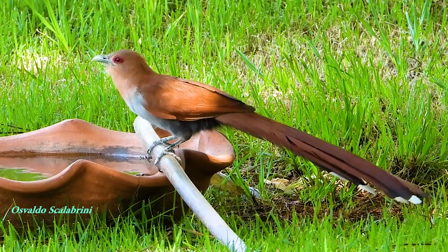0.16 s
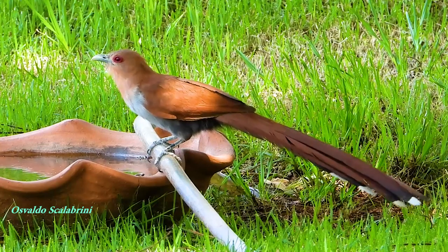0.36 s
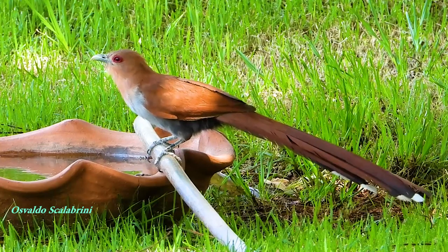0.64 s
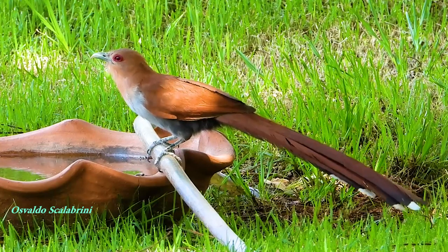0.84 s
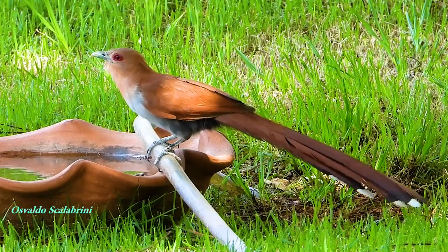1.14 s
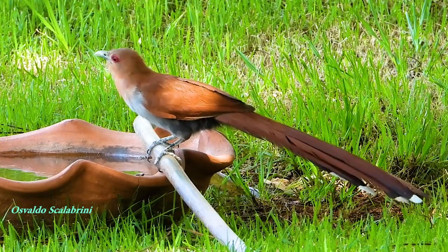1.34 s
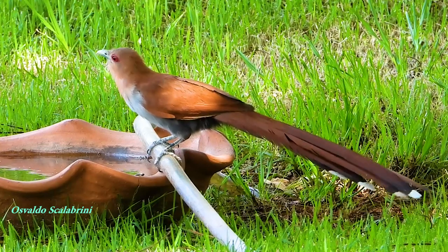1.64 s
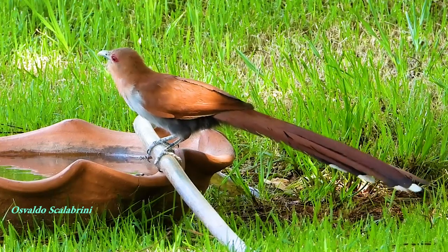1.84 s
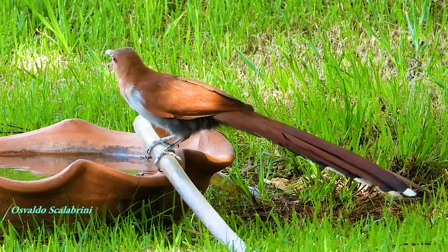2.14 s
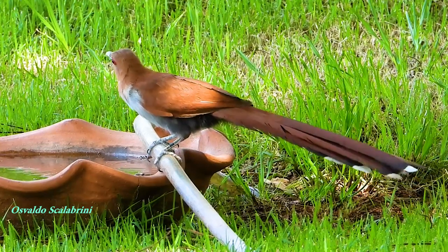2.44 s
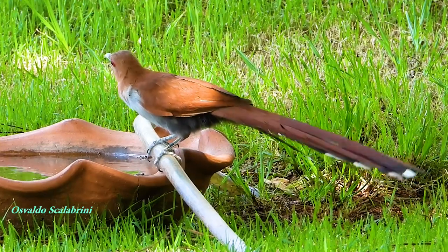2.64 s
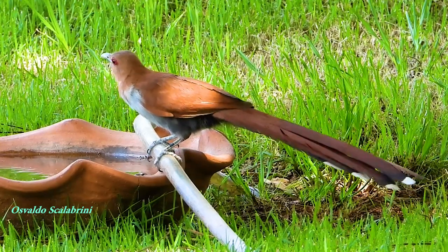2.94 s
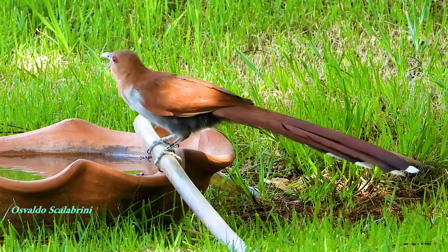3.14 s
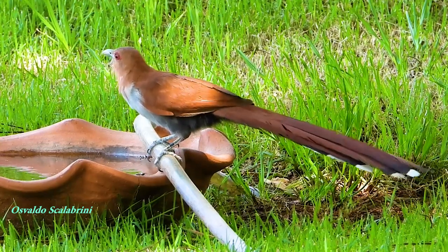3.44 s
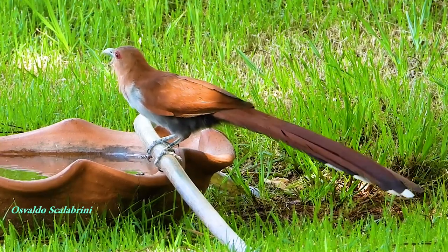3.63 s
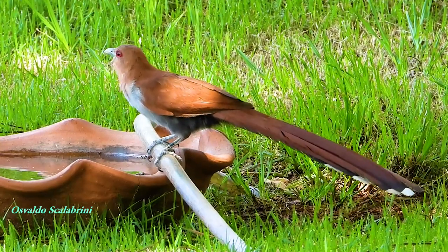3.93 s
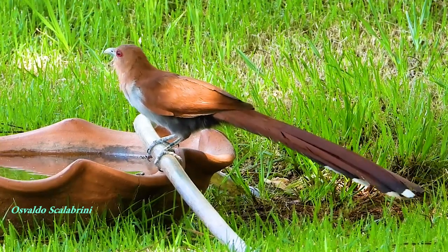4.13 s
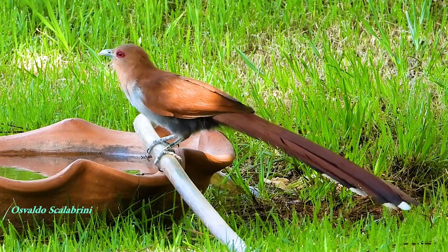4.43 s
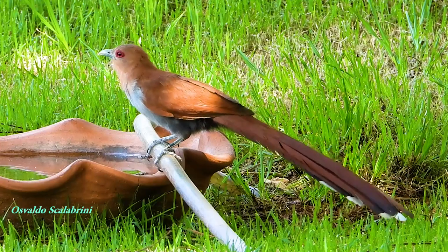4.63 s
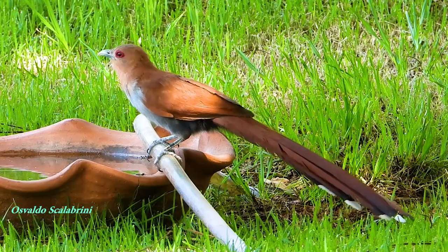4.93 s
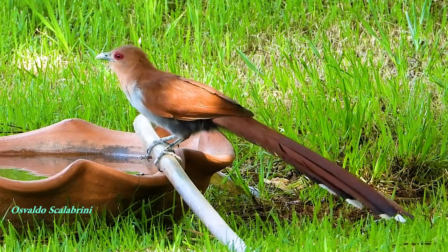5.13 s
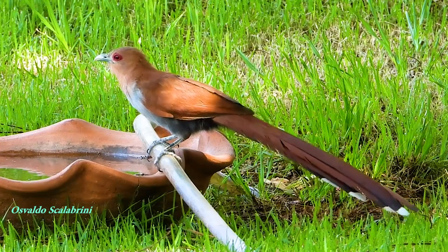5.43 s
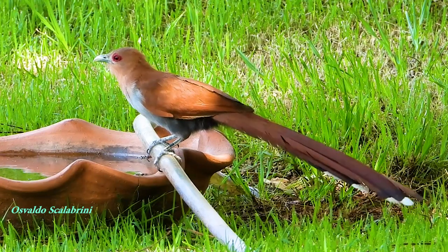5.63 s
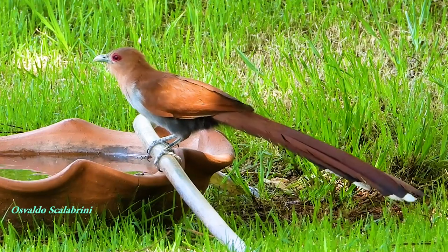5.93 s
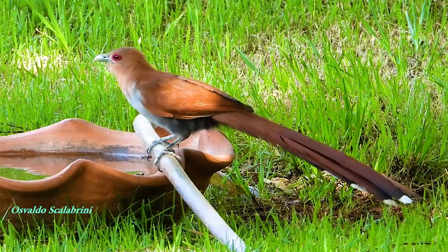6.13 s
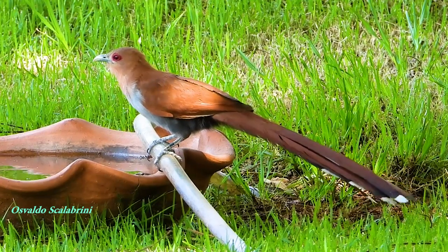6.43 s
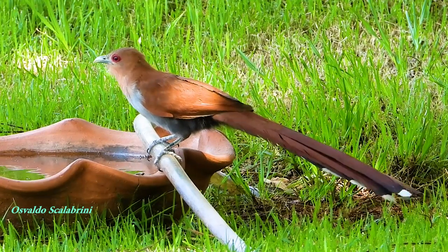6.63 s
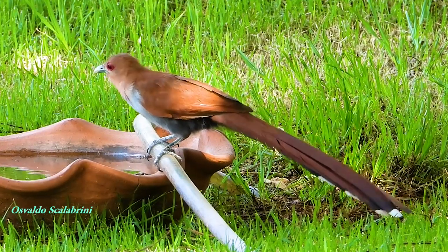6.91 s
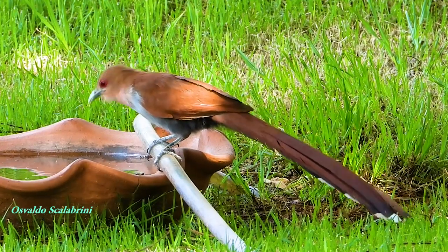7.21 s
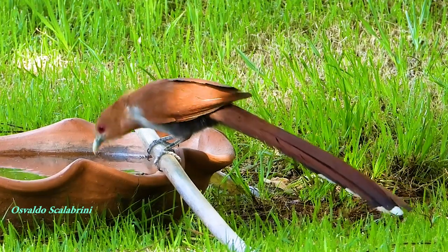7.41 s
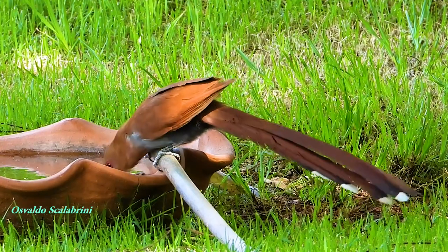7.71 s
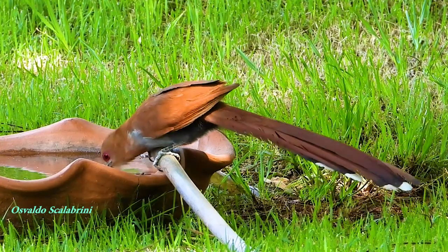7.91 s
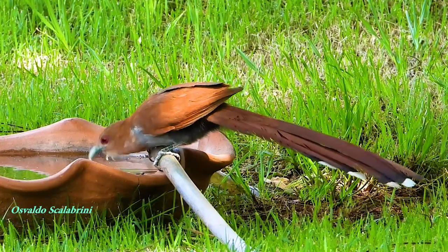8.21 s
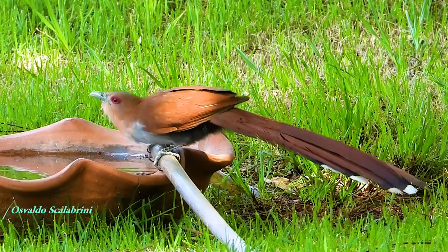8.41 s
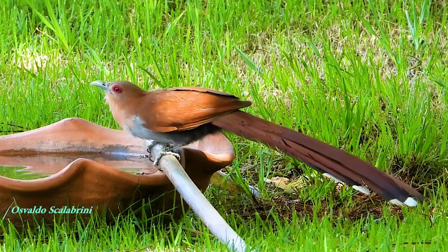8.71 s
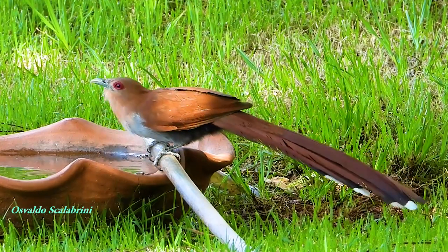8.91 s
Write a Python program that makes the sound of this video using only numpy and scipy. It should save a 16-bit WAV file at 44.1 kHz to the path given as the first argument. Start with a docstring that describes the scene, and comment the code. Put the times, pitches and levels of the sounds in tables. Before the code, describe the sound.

A near bird whistles quick up-and-down calls, chatters, then churrs, while small birds trill and a distant one sings over crickets and faint hiss.

```python
"""A garden with birds: a near one whistles up-and-down calls, chatters and churrs, small ones trill and chip,
and a far one sings the same song twice through the echoes of the trees, each with a drier ending. Faint buzzy
calls, two trilling crickets, ticks and a rustle lie over a thin hiss. Birds and crickets are near-sine tones
with drawn pitch and level, taps are dying sines, the hiss is shaped noise; the electronics add a very high
whine and the microphone cuts the bass. Source levels are set before panning, echoes and the microphone."""
import sys
import numpy as np
from scipy import signal
from scipy.io import wavfile
from scipy.ndimage import uniform_filter1d

SR = 44100
rng = np.random.default_rng(int(sys.argv[2]) if len(sys.argv) > 2 else 0)


def dump_mix(stems):
    """Bounce the given channels to the path in sys.argv[1] as a 16-bit WAV at rate SR."""
    frames = np.atleast_2d(stems).T  # one column per channel
    limited = np.clip(frames, -1, 1)  # hard clip at full scale
    pcm = np.round(limited * 32767).astype(np.int16)
    wavfile.write(sys.argv[1], SR, pcm)


N = 399546
EDGE_HZ = 15900  # top of the band


def gain_of(db):
    """Decibels to an amplitude factor."""
    return 10 ** (np.asarray(db) / 20)


def evened(x):
    """Scales to unit rms."""
    return x / np.sqrt(np.mean(x ** 2) + 1e-20)


def read(points, hz):
    """Reads a spectrum table on a log-frequency axis."""
    f, value = np.transpose(points)
    return np.interp(np.log(hz + 1), np.log(f + 1), value)


def add(mix, s, sound):
    """Adds a sound at time s, trimmed to the scene."""
    at = round(s * SR)
    part = mix[max(at, 0):][:len(sound) + min(at, 0)]
    part += sound[max(-at, 0):][:len(part)]


def sides(x, pan_db):
    """Places a sound left (positive) or right of centre by level alone."""
    return x * gain_of([[pan_db / 2], [-pan_db / 2]])


def smooth_noise(count, size):
    """Slow random wander of unit rms: white noise averaged over size samples."""
    return evened(uniform_filter1d(rng.standard_normal(count), size=size))


def voice(hz, db, beak=None, rough=0.):
    """A near-sine syrinx tone; its overtones fade less than the fundamental when the note is choked, and rasp."""
    jitter = .03 * rough * smooth_noise(len(hz), 60)
    turns = 2 * np.pi * (np.cumsum(hz * (1 + jitter)) / SR + rng.random())
    tone = np.sin(turns)
    if beak:
        rasp = 1 + rough * smooth_noise(len(hz), 70)
        under_db = np.max(db) - db
        choke_db = 1.1 * np.maximum(under_db - 12.5, 0) - 0.067 * np.minimum(under_db, 13)
        overtone_db = choke_db + 2 + 9 * rough  # harsh notes are richer
        for k in range(2, 7):
            in_band = k * hz < EDGE_HZ
            tone += gain_of(read(beak, k * hz) + overtone_db) * rasp * np.sin(k * turns) * in_band
    soft_ends = signal.windows.tukey(len(hz), min(1, 480 / len(hz)))
    return np.sqrt(2) * gain_of(db) * tone * soft_ends


def glide(rows, beak, rough):
    """A note that follows rounded curves of pitch and level, rows of (t/s, f/Hz, level/dB)."""
    s, hz, db = np.transpose(rows)
    t = np.arange(s[0], s[-1], 1 / SR)
    hz, db = (uniform_filter1d(np.interp(t, s, c), size=220, mode="nearest") for c in (hz, db))
    return s[0], voice(hz, db, beak, rough)


def drop(length, start_hz, end_hz, db, bend, beak, rough):
    """A short falling note; a small bend falls early, a large one late."""
    u = np.linspace(0, 1, int(length * SR))
    hz = start_hz + (end_hz - start_hz) * u ** bend
    swell = np.sin(np.pi * u ** 0.66) ** 0.43
    return voice(hz, db, beak, rough) * swell


def trees(x, t60, start_s, same):
    """Scattered echoes off trunks and leaves: sparse taps of random sign that die away."""
    taps = np.zeros((2, SR // 2))
    at = np.arange(0, SR // 2 - 20, 20) + rng.integers(0, 20, (2, (SR // 2 - 1) // 20))
    np.put_along_axis(taps, at, rng.choice([-1., 1.], at.shape), 1)
    same = np.clip(same, 0, 1)  # left-right likeness
    taps[1] = same * taps[0] + np.sqrt(1 - same ** 2) * taps[1]
    t = np.arange(SR // 2) / SR - start_s
    taps *= gain_of(-60 * t / t60) * np.clip(t / 0.0039, 0, 1)
    taps = signal.lfilter([1, 2, 1], [1], taps)  # leaves and air swallow the treble
    return signal.fftconvolve(x[None], taps / np.linalg.norm(taps[0]), axes=1)[:, :N]


def echo(x, s, db):
    """One reflection, s later."""
    return gain_of(db) * np.pad(x, (round(s * SR), 0))[:N]


# Colour of the hiss: (f/Hz, relative level/dB per Hz)
HISS_COLOUR = [(60, -19.5), (400, -17.5), (700, -23.5), (1100, -9.5), (1800, -3), (2800, -2), (5000, -4.5),
               (9000, -9), (15900, -11)]
# Stereo width of the hiss: (f/Hz, left-right likeness from 0 to 1)
HISS_LIKENESS = [(600, 0.067), (2000, 0.34), (5000, 0.73), (9000, 1)]
HISS_DB = -72  # rms


def hiss():
    """Distant leaves and microphone noise: random short-time spectra in slowly drifting patches."""
    frames, hz = N // 128 + 5, np.fft.rfftfreq(512, 1 / SR)
    a, b, c, d, patches = rng.standard_normal((frames, 257, 5)).T
    patches = uniform_filter1d(patches, size=8, axis=0)  # across frequency
    patches = evened(uniform_filter1d(patches, size=30, axis=1))  # along time
    same = np.clip(read(HISS_LIKENESS, hz), -1, 1)[:, None]
    left = a + 1j * b
    right = same * left + np.sqrt(1 - same ** 2) * (c + 1j * d)
    spectra = np.array([left, right]) * gain_of(read(HISS_COLOUR, hz)[:, None] + 1.1 * patches)
    noise = signal.istft(spectra, nperseg=512, noverlap=384)[1][:, :N]
    return gain_of(HISS_DB) * evened(noise)


# Near cricket, one row a bout: (start t/s, wing strokes, stroke spacing t/s, t/s gained by the quick start)
CRICKET_BOUTS = [(.025, 49, .0451, .009), (2.39, 64, .0456, .063), (5.343, 32, .04533, .044),
                 (6.926, 48, .0453, .022)]
SETTLE_STROKES = 4.0  # strokes over which the quick start eases off


def crickets():
    """Each wing stroke is a short, slightly falling tone; a second, higher insect trills steadily farther off."""
    near, t = np.zeros(N), np.arange(0, .019, 1 / SR)
    for start_s, count, gap_s, gained_s in CRICKET_BOUTS:
        k = np.arange(count)
        for at in start_s + k * gap_s - gained_s * (1 - np.exp(-k / SETTLE_STROKES)):
            db = -69.5 + rng.standard_normal()  # strokes differ in strength
            stroke = voice(3320 - 3500 * t, db - 250 * t) * np.sin(np.pi * t / t[-1]) ** .5
            add(near, at - t[-1] / 3, stroke)
    u = np.arange(N) / SR * 29.7 % 1  # position within each far stroke, 29.7 a second
    far_hz = 6600 + 380 * np.sin(np.pi * np.minimum(u / 0.32, 1))
    far = voice(far_hz, -81) * np.sin(np.pi * np.minimum(u / 0.41, 1))
    near_side = sides(near, 11)
    grass = gain_of(-3) * trees(near, 0.045, 0.006, 0.8)
    return near_side + grass + trees(far, 0.041, 0.00092, 0.25)


# The climb: (share of the rise time, share of the pitch range, share of the way from early to top level)
CLIMB = [(0.298, 0.424, .05), (.8, 0.929, 0.8)]
# The plunge: (share of the fall time, share of the pitch range, level/dB against the top)
PLUNGE = [(.53, .66, -7), (.99, .05, -27)]
# The second arch: (t/s after the choke, share of the way from dip to crest pitch, level/dB against the crest)
ARCH = [(0, 0, -21), (.016, 0.79, -2), (.034, .99, 0.5)]
# Its decline: (t/s after the choke, share of the way from last to crest pitch, level/dB against the crest)
DECLINE = [(.054, .72, -3), (.069, 0.094, -7)]
# Whistle overtones as throat and beak pass them: (f/Hz, level/dB against the fundamental, before choke and rasp)
WHISTLE_BEAK = [(3400, -31.5), (4700, -42.5), (6000, -31.5), (7200, -39.5), (9000, -36.5), (12000, -40.5),
                (15000, -45.5)]
ONSET_DB = -14.5  # against the early level


def whistle(top_s, rise_s, fall_s, choked_s, start_hz, top_hz, dip_hz, crest_hz, last_hz,
            early_db, top_db, crest_db):
    """Climbs to the top, plunges almost choked, and rises again in a lower, softer arch."""
    start_s = top_s - rise_s
    again_s = top_s + fall_s + choked_s
    rows = [(start_s, start_hz, early_db + ONSET_DB)]
    for u, p, q in CLIMB:
        rows.append((start_s + rise_s * u, start_hz + p * (top_hz - start_hz), early_db + q * (top_db - early_db)))
    rows.append((top_s, top_hz, top_db))
    for u, p, db in PLUNGE:
        rows.append((top_s + fall_s * u, dip_hz + p * (top_hz - dip_hz), top_db + db))
    for s, p, db in ARCH:
        rows.append((again_s + s, dip_hz + p * (crest_hz - dip_hz), crest_db + db))
    for s, p, db in DECLINE:
        rows.append((again_s + s, last_hz + p * (crest_hz - last_hz), crest_db + db))
    return glide(rows, WHISTLE_BEAK, 0.22)


# Past the crest: wobble length in s, pitch sunk to in Hz, fade in dB
QUICK_S, END_HZ, FADE_DB = .013, 2052, 21


def wobbles(start_s, crest_s, end_s, start_hz, crest_hz, start_db, crest_db, slow_s, crest_length_s):
    """Start, top pitch and level of each wobble of a churr, as one arch of effort."""
    rising = np.arange(start_s, crest_s - slow_s / 2, slow_s)
    sinking = np.arange(crest_s + crest_length_s, end_s + QUICK_S / 2, QUICK_S)
    s = np.r_[rising, crest_s, sinking]
    before = np.clip((crest_s - s) / (crest_s - start_s), 0, 1)
    after = np.clip((s - crest_s) / (end_s - crest_s), 0, 1)
    hz = crest_hz - (crest_hz - start_hz) * before ** 1.1 - (crest_hz - END_HZ) * after ** 1.3
    db = crest_db - (crest_db - start_db) * before ** 1.87 - FADE_DB * after ** 1.68
    return np.transpose([s, hz, db])


# Overtones of churrs and chatter: (f/Hz, level/dB against the fundamental, before choke and rasp)
HARSH_BEAK = [(3400, -22.5), (4700, -32), (6000, -30), (7200, -41.5), (9000, -35.5), (12000, -41.5),
              (15000, -47.5)]


def churr(rows):
    """Each wobble holds near its top, sags and fades towards its end, then swings back up."""
    s, top_hz, db = np.transpose(rows)
    t = np.arange(s[0], s[-1], 1 / SR)
    k = np.searchsorted(s, t, "right") - 1  # which wobble is sounding
    length = np.diff(s)[k]
    sag = ((t - s[k]) / length) ** (length / .006)
    depth = 0.41 * np.minimum(length / .013, 1) ** 2  # quick wobbles sag less
    hz = uniform_filter1d(top_hz[k] * (1 - depth * sag), size=120)
    level_db = uniform_filter1d(db[k] - 17 * sag ** 1.06, size=110)
    return s[0], voice(hz, level_db, HARSH_BEAK, 0.56)


# Near bird, levels before its overall trim. One row a whistle: (top t/s, rise t/s, fall t/s, choked t/s,
# start f/Hz, top f/Hz, dip f/Hz, second crest f/Hz, last f/Hz,
# early level/dB, top level/dB, second crest level/dB, bounce delay t/s)
WHISTLES = [(0.022, 0.06, 0.015, .011, 2388, 2850, 1634, 2322, 2043, -37.5, -36, -43.5, .00586),
            (0.32, 0.056, 0.016, .011, 2333, 2833, 1596, 2321, 2104, -43, -34, -44.5, .00586),
            (0.61, 0.057, 0.016, .011, 2370, 3000, 1780, 2422, 2136, -41.5, -33.5, -43, 0.0056),
            (0.911, 0.056, 0.019, 0.012, 2400, 2880, 1610, 2300, 2036, -41.5, -35.5, -45, .00586),
            (2.602, 0.053, 0.018, .017, 2564, 3027, 1680, 2503, 1980, -37, -31.5, -41, .00332),
            (2.914, .057, 0.014, .011, 2454, 3004, 1733, 2479, 2037, -37.5, -30.5, -40.5, 0.0034),
            (3.187, .058, .017, .011, 2334, 2910, 1595, 2410, 2160, -38.5, -34, -39.5, .00638),
            (3.47, 0.061, .017, 0.013, 2310, 3059, 1873, 2583, 2237, -42, -30.5, -37.5, 0.0032),
            (3.779, .055, 0.02, 0.0098, 2160, 3144, 1750, 2480, 2140, -40.5, -30.5, -39.5, 0.003),
            (4.066, 0.053, .026, 0.0086, 2220, 3046, 1975, 2428, 2225, -42.5, -30, -38, 0.0036)]
# One row a churr: (start t/s, crest t/s, end t/s, start f/Hz, crest f/Hz, start level/dB, crest level/dB,
# wobble length before the crest t/s, wobble length at the crest t/s)
CHURRS = [(6.995, 7.076, 7.13, 2275, 3090, -59.5, -35, 0.011, .013),
          (7.405, 7.473, 7.523, 2420, 3023, -50, -34, 0.023, .017),
          (7.765, 7.81, 7.889, 2448, 2906, -43.5, -35, .023, .022),
          (8.1, 8.145, 8.205, 2528, 3020, -41.5, -35.5, .022, .019)]
# Chatter of short falling notes: (t/s, start f/Hz, level/dB)
CHATTER = [(2.044, 2510, -47.5), (2.089, 2745, -41.5), (2.138, 2787, -39.5), (2.184, 2824, -39),
           (2.23, 2835, -40), (2.278, 2655, -44), (2.345, 2620, -60.5)]


def near_bird():
    """Whistles, churrs and chatter, each doubled by its bounce off the ground or a hard surface nearby."""
    whistles, harsh = np.zeros((2, N))
    for *shape, late_s in WHISTLES:
        s, call = whistle(*shape)
        add(whistles, s, call)
        add(whistles, s + late_s, gain_of(-5.0) * call)
    for row in CHURRS:
        add(harsh, *churr(wobbles(*row)))
    for s, hz, db in CHATTER:  # a falling note, then a softer, rougher tail
        add(harsh, s, drop(.011, hz, 0.48 * hz, db, 2.5, HARSH_BEAK, 0.47))
        add(harsh, s + .013, drop(0.012, .8 * hz, 0.69 * hz, db - 10, 1.1, HARSH_BEAK, 0.75))
    bounce = echo(harsh, .0045, -5)
    scatter = gain_of(-15) * trees(harsh, 0.068, .006, .9)[0]
    bird = gain_of(-1.0) * (whistles + harsh + bounce + scatter)
    return sides(bird, -2.0) + gain_of(-19.0) * trees(bird, 0.55, 0.0014, 0.92)


# Faint buzzy calls far away: (t/s, length t/s, level/dB before the lifts in the mix)
BUZZES = [(0.033, 0.1, -73.5), (0.498, 0.033, -80.5), (0.851, 0.082, -72), (3.105, 0.11, -71),
          (4.079, 0.094, -74), (4.86, 0.097, -74), (7.226, 0.11, -73.5), (8.572, 0.1, -74)]


def buzzes():
    """A high note that trembles fast in pitch, blurred by distance."""
    x = np.zeros(N)
    for s, length, db in BUZZES:
        t = np.arange(0, length, 1 / SR)
        tremble = 230 * np.sin(2 * np.pi * 42 * t)
        drift = 90 * np.cos(2 * np.pi * t / length)
        call = voice(5540 + tremble + drift, db + 1.0) * np.sin(np.pi * t / length) ** .3
        add(x, s, call)
    return sides(x, 1.5) * 1.2 + trees(x, 0.12, 0.0016, 0.94)


# Trill of falling notes: (t/s, length t/s, end f/Hz, level/dB)
TRILL = [(4.359, 0.011, 3120, -35), (4.381, 0.014, 3330, -34.5), (4.406, 0.019, 3860, -42),
         (4.432, 0.019, 4110, -44), (4.463, 0.02, 4470, -46), (4.504, .016, 4720, -45),
         (4.544, .022, 4635, -44), (4.589, 0.027, 4600, -47), (4.643, 0.023, 4475, -48.5)]
TRILL_HZ = 5430  # every note starts here
# Sharp chips of another bird: (t/s, level/dB)
CHIPS = [(0.652, -45), (4.944, -42.5), (8.004, -50)]
# Overtones of the trill: (f/Hz, level/dB against the fundamental, before choke and rasp)
SMALL_BEAK = [(7000, -14), (8500, -29), (10000, -1.5), (11500, -20.5), (13000, -23), (15000, -23)]
# Overtones of the chips and the far song: (f/Hz, level/dB against the fundamental, before choke and rasp)
FAR_BEAK = [(6000, -32), (8000, -25.5), (10000, -18.5), (13000, -40)]


def small_birds():
    """The trill with its strong octave, and single chips that dive and hook upward."""
    trill, chips = np.zeros((2, N))
    for s, length, end_hz, db in TRILL:
        add(trill, s, drop(length, TRILL_HZ, end_hz, db, .6, SMALL_BEAK, 0.26))
    for s, db in CHIPS:
        dive = [(s, 6900, db - 19.5), (s + 0.0079, 5500, db)]
        hook = [(s + 0.012, 5600, db), (s + 0.027, 6100, db - 16.5)]
        add(chips, *glide(dive + hook, FAR_BEAK, 0.49))
    trill += echo(trill, 0.0042, -7)
    chips += echo(chips, 0.0087, -13.5)
    trill_air = gain_of(-15.0) * trees(trill, 0.34, 0.0024, 0.75)
    chip_air = gain_of(-18.5) * trees(chips, 0.32, .005, .5)
    return trill + trill_air + sides(chips, 1) + chip_air


# One row a note of the second song: (first level/dB, last level/dB, pitch as (t/s, f/Hz))
SONG = [(-85.5, -63, [(5.552, 5400), (5.578, 3680)]), (-72.5, -69, [(5.612, 4650), (5.64, 5200)]),
        (-63, -57.5, [(5.65, 4400), (5.675, 4205), (5.7, 3750), (5.718, 3080), (5.726, 2555)]),
        (-67, -66, [(5.803, 4660), (5.822, 5220)]), (-56, -57.5, [(5.834, 5290), (5.85, 5450), (5.88, 3857),
        (5.902, 2780), (5.957, 4510), (5.97, 3640), (6.0, 2570), (6.02, 2760), (6.031, 2300)]),
        (-59.5, -56, [(6.085, 5550), (6.092, 5970), (6.106, 6090), (6.112, 5120)]),
        (-60.5, -49, [(6.117, 5630), (6.128, 7190), (6.197, 5710), (6.22, 4520), (6.268, 3190)]),
        (-60.5, -49.5, [(6.308, 6980), (6.314, 5250), (6.33, 4995), (6.347, 4370)]),
        (-63.5, -62, [(6.39, 4750), (6.42, 4344), (6.445, 4360)])]
# The first song against the second: (t/s earlier, level/dB)
FIRST_SONG = (4.408, -3)


def far_bird():
    """The same song twice, with a blurred slap from the far trees and a long haze of echoes."""
    song = np.zeros(N)
    for first_db, last_db, pitch in SONG:
        s, hz = np.transpose(pitch)
        db = np.interp(s, s[[0, -1]], [first_db, last_db])
        add(song, *glide(np.transpose([s, hz, db]), FAR_BEAK, 0.26))
    earlier_s, first_song_db = FIRST_SONG
    song += gain_of(first_song_db) * np.roll(song, -round(earlier_s * SR))
    direct = sides(song, 5)
    slap = gain_of(-8) * trees(song, 0.23, .055, 0.94)
    haze = gain_of(-8.5) * trees(song, 0.69, 0.009, 0.75)
    return direct + slap + haze


# Ending of each far song, drier than the rest: a quick falling note, then a hooked one:
# (fall t/s, start f/Hz, end f/Hz, fall level/dB, hook t/s, hook level/dB)
SONG_ENDINGS = [(2.404, 5140, 3240, -64, 2.426, -62.5), (6.781, 7100, 4300, -62, 6.834, -54.5)]
# Shape of the hooked note: (t/s from its start, f/Hz, level/dB against the hook level)
HOOK = [(0, 3730, -6), (.008, 5890, 2.5), (.014, 5700, -2), (.028, 3570, -3.5)]


def song_endings():
    """The far song's thin quick last notes, with little echo."""
    x = np.zeros(N)
    for fall_s, start_hz, end_hz, fall_db, hook_s, hook_db in SONG_ENDINGS:
        add(x, fall_s, drop(.015, start_hz, end_hz, fall_db, 1.3, FAR_BEAK, .2))
        add(x, *glide(np.add(HOOK, (hook_s, 0, hook_db)), FAR_BEAK, 0.36))
    return sides(x, 1.5) + gain_of(-10.5) * trees(x, 0.14, .004, .6)


# Small ticks and taps nearby: (t/s, attack level/dB before the bass cut, centre f/Hz)
TICKS = [(5.845, -61, 1100), (6.088, -36, 2600), (6.592, -56, 1600), (6.68, -65, 1500), (6.776, -64, 1890),
         (6.83, -62, 2500), (6.872, -62, 1490), (6.924, -49, 2570), (6.948, -54, 2200), (7.12, -44.5, 3670),
         (8.402, -50.5, 1730), (8.819, -58, 1350)]
# A rustle close by: (t/s, level/dB)
RUSTLE = [(6.4, -85.5), (6.9, -69), (7.15, -79), (7.6, -93.5)]


def ticks():
    """Dry taps of twigs and leaves: a few cycles each, over a short crackling rustle of random grains."""
    x, t = np.zeros(N), np.arange(0, .01, 1 / SR)
    for s, db, hz in TICKS:
        add(x, s, gain_of(db - 60 * t / .004) * np.sin(2 * np.pi * hz * t))  # 60 dB down in 4 ms
    x = signal.sosfilt(signal.butter(2, 800, "high", fs=SR, output="sos"), x)  # small things carry no bass
    strength = gain_of(5 * np.minimum(rng.exponential(1, N), 2.5))
    sparse = rng.random(N) < 300 / SR  # about 300 grains a second
    grains = strength * rng.standard_normal(N) * sparse
    band = signal.butter(3, [1000, 2800], "band", fs=SR, output="sos")
    crackle = evened(signal.sosfilt(band, grains))
    rustle_db = np.interp(np.arange(N) / SR, *np.transpose(RUSTLE), left=-200, right=-200)
    x += crackle * gain_of(rustle_db)
    return sides(x, 0.91) + gain_of(-8.5) * trees(x, 0.11, 0.0032, 0.42)


def scene():
    """All the voices of the garden over its hiss."""
    animals = crickets() + near_bird() + buzzes() + small_birds() + far_bird() + song_endings()
    return hiss() + animals + ticks()


# Whine of the electronics: (f/Hz, rms level/dB)
WHINE = (15734, -80)


def record(dry):
    """The microphone cuts the bass steeply, the electronics add their whine; then the band limit."""
    hz, db = WHINE
    thin = signal.sosfilt(signal.butter(3, 750, "high", fs=SR, output="sos"), dry)
    wired = thin + np.sqrt(2) * gain_of(db) * np.sin(2 * np.pi * hz * np.arange(N) / SR)
    band_limit = signal.firwin(1023, EDGE_HZ, window=("kaiser", 9), fs=SR)
    return signal.oaconvolve(wired, band_limit[None], "same")


dry = scene()
out = record(dry)
dump_mix(out)
```